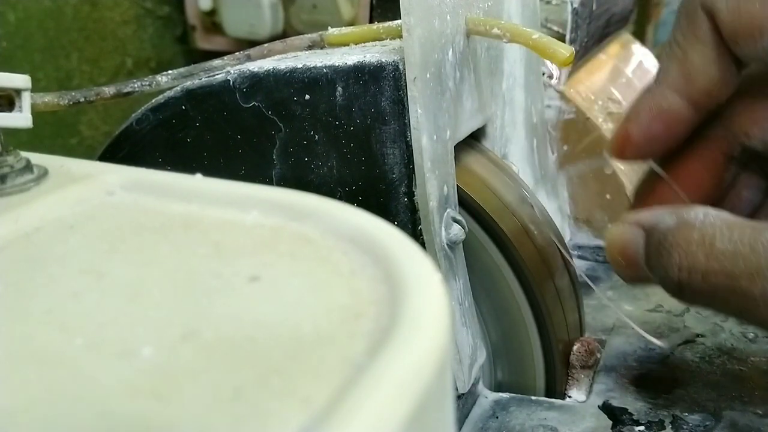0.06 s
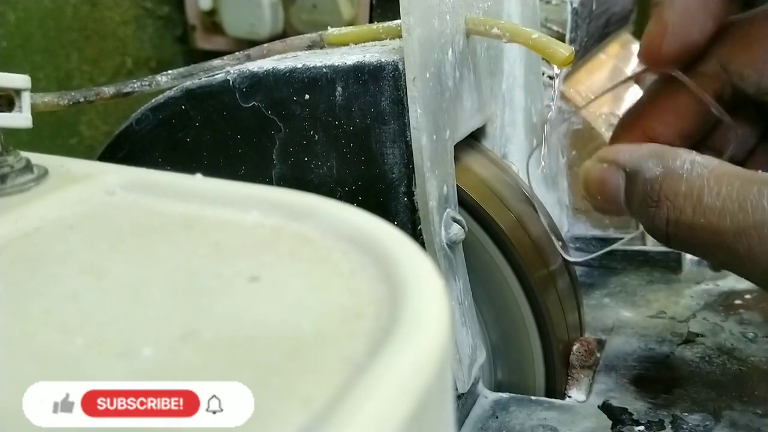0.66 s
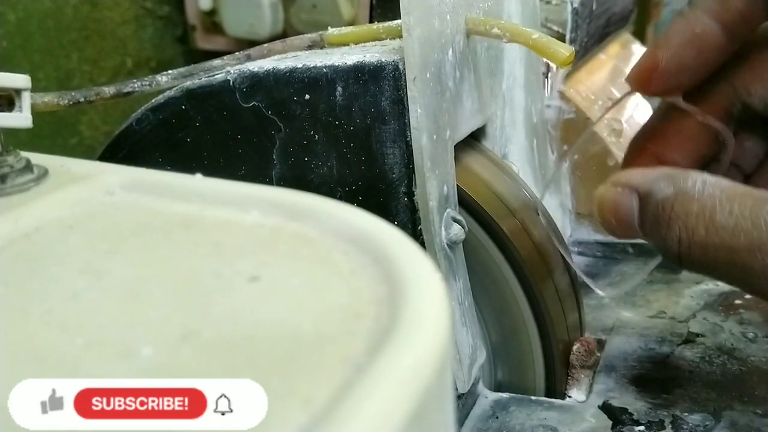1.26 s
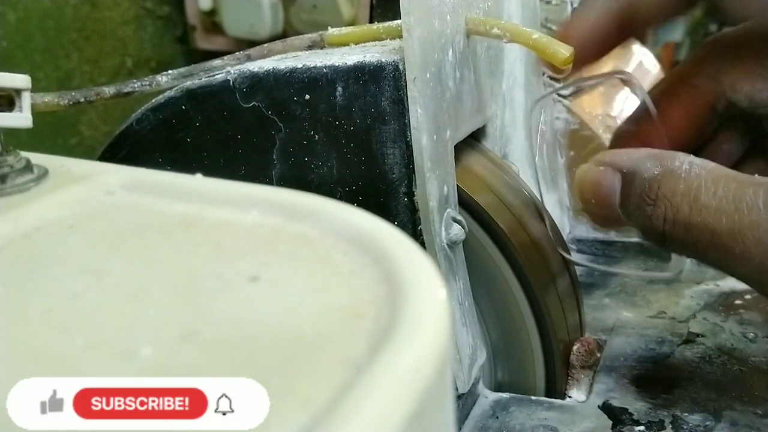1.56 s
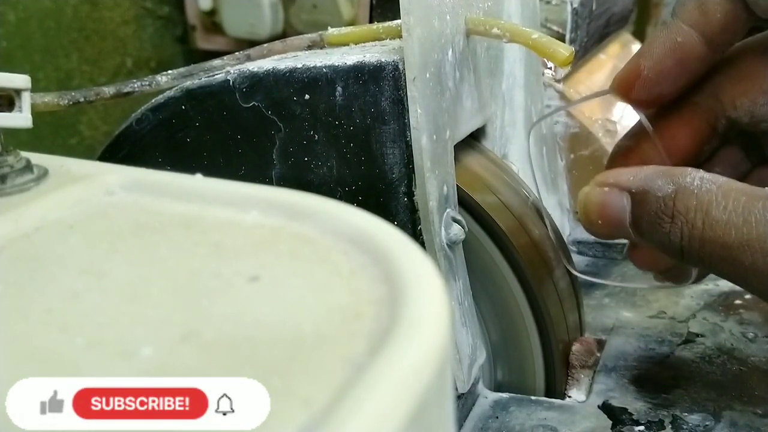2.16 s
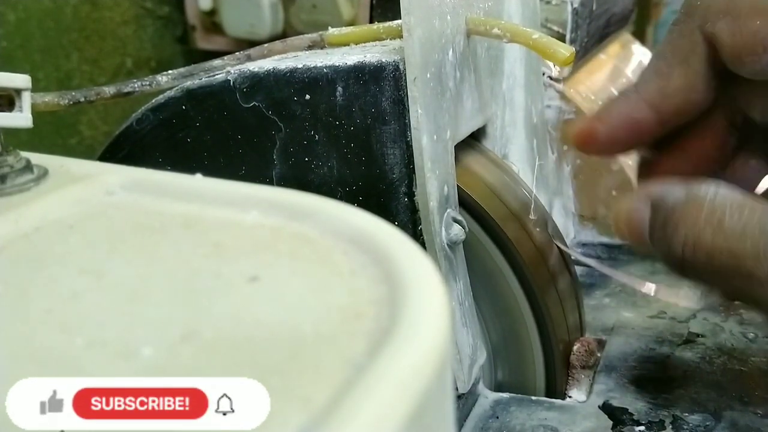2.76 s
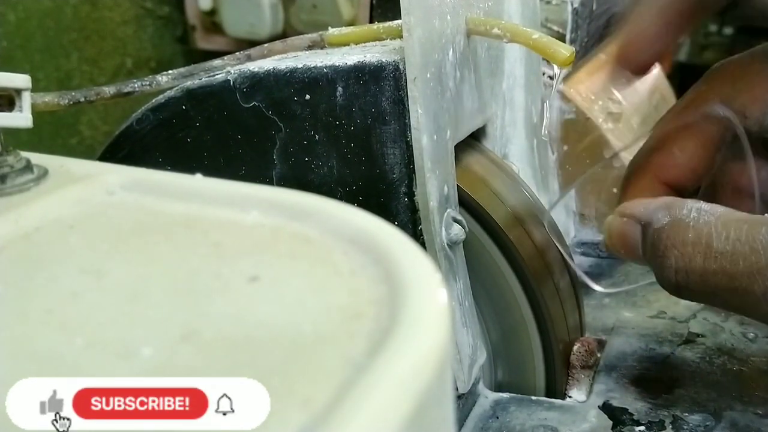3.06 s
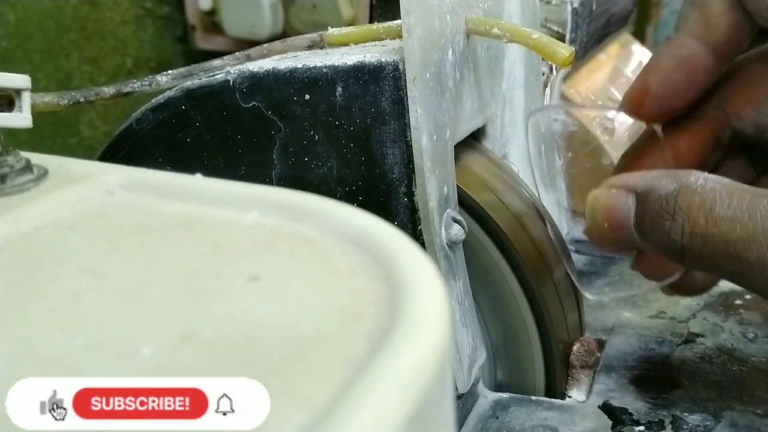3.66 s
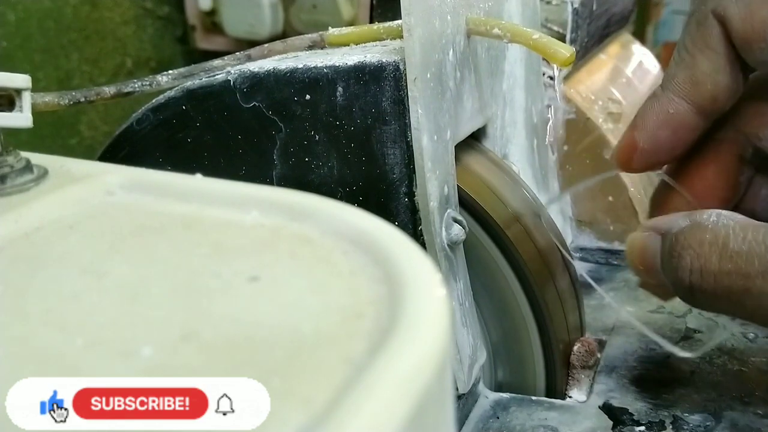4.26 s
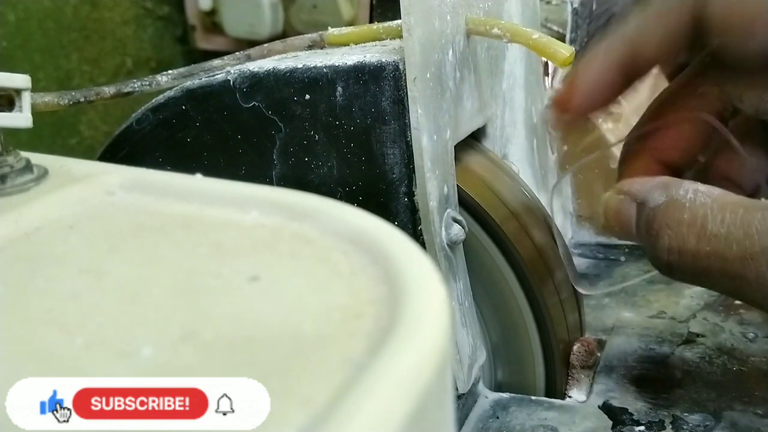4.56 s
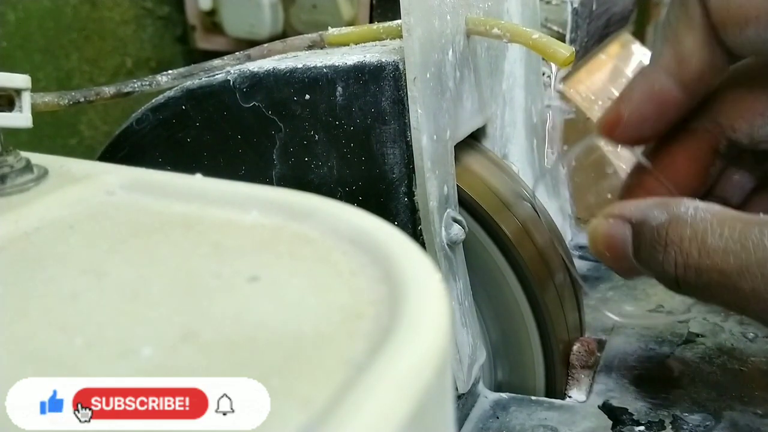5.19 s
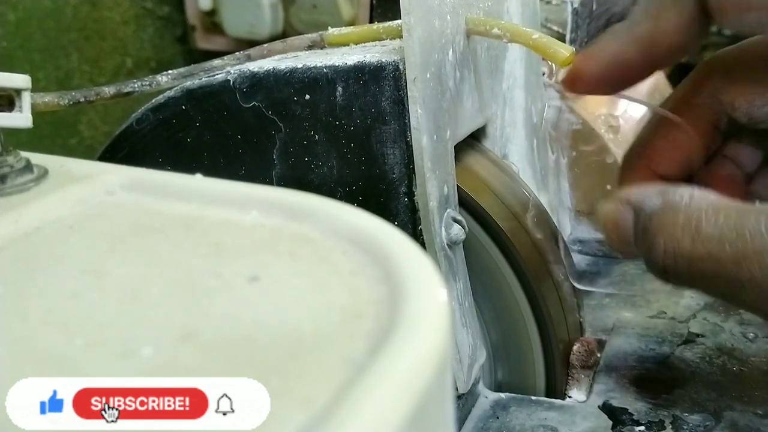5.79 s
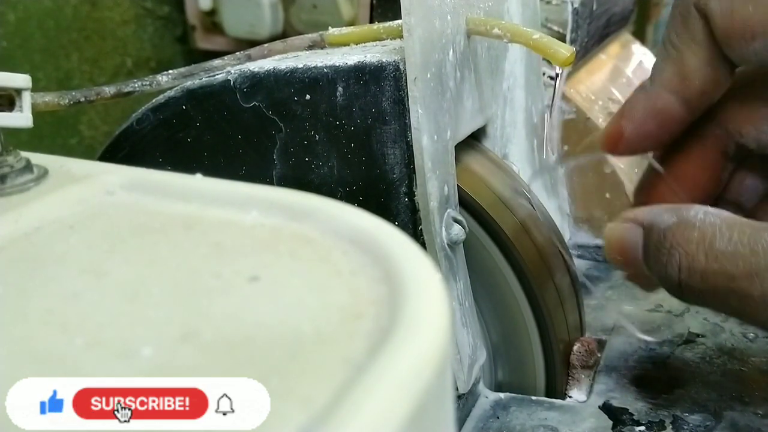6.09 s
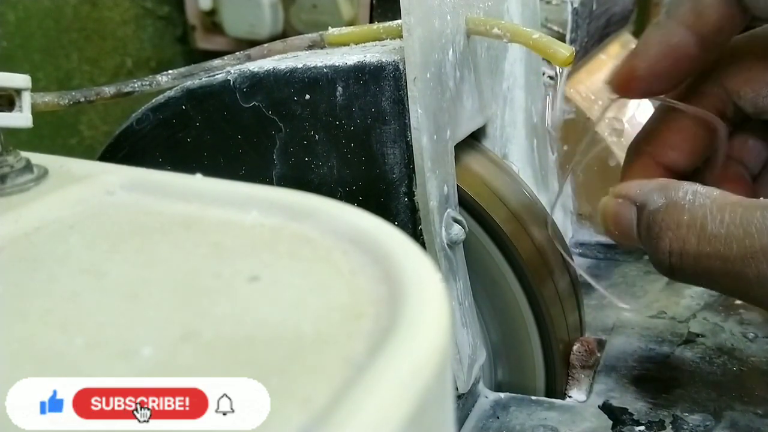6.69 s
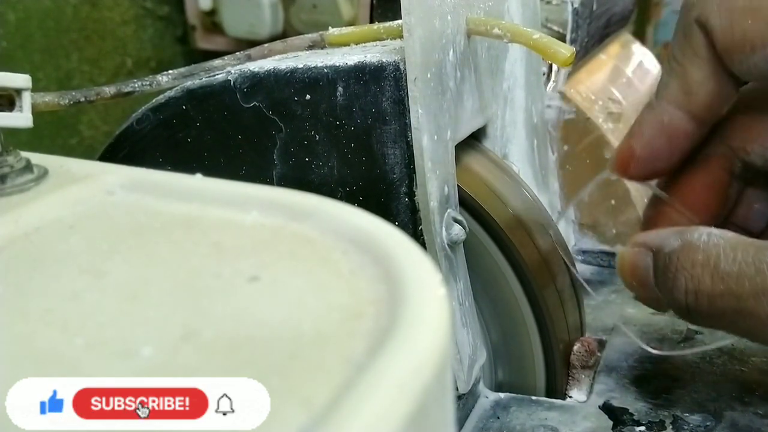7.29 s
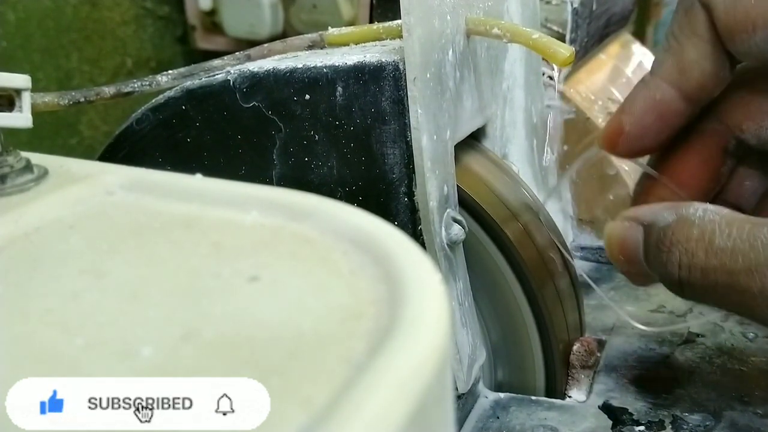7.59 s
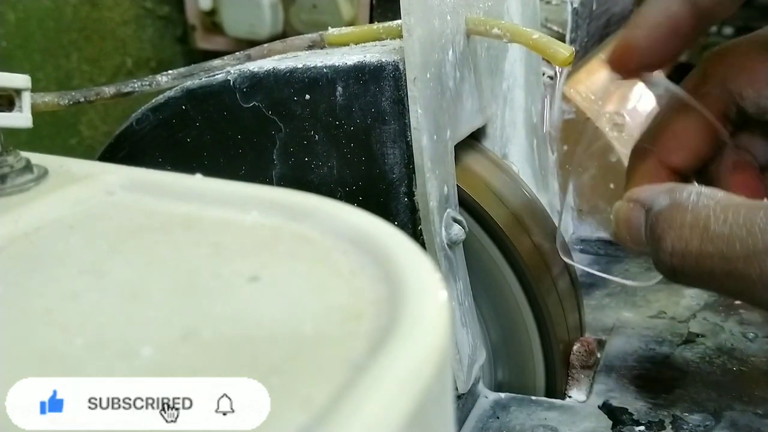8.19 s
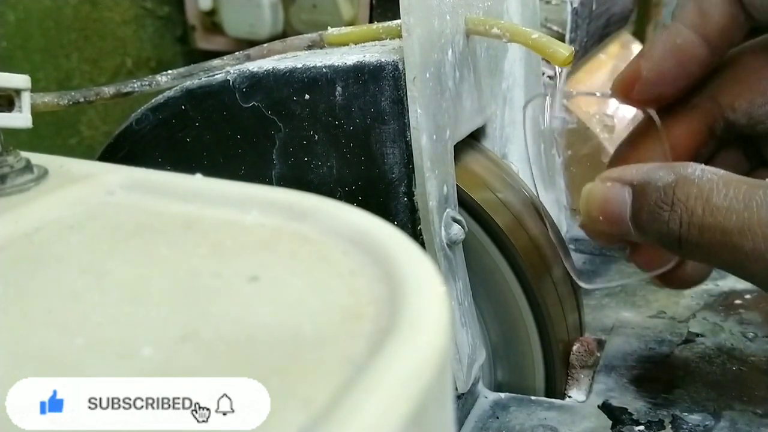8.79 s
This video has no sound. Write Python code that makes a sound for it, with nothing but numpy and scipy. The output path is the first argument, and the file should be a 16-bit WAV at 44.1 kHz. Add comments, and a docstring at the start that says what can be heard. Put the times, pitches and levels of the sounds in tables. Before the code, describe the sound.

A spectacle lens grinds on a wet spinning wheel with a high, buzzing hiss, ringing scrapes and brief squeals over low machine rumble.

```python
"""From the start, a spectacle lens is turned by hand against a wet grinding wheel, over a machine's hum.
The same grit passes about 49 times a second, so the hiss buzzes, and the lens rings in gliding scrapes.
Near 0.5 s the lens sticks and slips with a squeal. Around 1.5 s a low rumble swells and the first drop
of cooling water falls. The rumble sinks at 2.5 s, more drops follow, and the lens squeals near 4.5 s.
The rumble returns after 5 s, a last squeal comes near 6.4 s, and the grinding carries on to 9 s."""
import sys
import numpy as np
from scipy import signal
from scipy.fft import rfft, irfft, next_fast_len
from scipy.io import wavfile
from scipy.ndimage import uniform_filter1d, map_coordinates

SR = 44100
rng = np.random.default_rng(int(sys.argv[2]) if len(sys.argv) > 2 else 0)


def bounce(signal):
    """Save signal as a 16-bit WAV file at the path given by the first command-line argument."""
    frames = np.transpose(np.atleast_2d(signal))
    limited = np.clip(frames, -1, 1)
    pcm = np.round(limited * 32767).astype(np.int16)
    wavfile.write(sys.argv[1], SR, pcm)


N = 398663
TIME = np.arange(N) / SR


# The tone of the grinding on the left and on the right. Columns: pitch_hz, relative_db
LEFT_TONE = [(500, -36), (1100, -30), (1350, -28.5), (1550, -12), (1750, -7), (2100, 0.5), (2900, 2.5),
             (3500, -3.5), (5000, -2), (6000, -7), (7200, 2), (8000, -7.5), (10500, -0.5), (13300, 3),
             (15700, -9)]
RIGHT_TONE = [(500, -31.5), (1100, -32), (1400, -29), (1750, -6), (2100, -2), (2900, -2.5), (3500, -3.5),
              (5000, -8.5), (6000, -5.5), (7200, -2), (8000, -10), (10500, -10.5), (13300, -15),
              (15700, -13)]
# Peaks and dips added by the wheel guard and tray. Columns: pitch_hz, width_hz, left_db, right_db
GUARD_PEAKS = [(1720, 110, -6, -6), (2130, 50, 3, 4), (2400, 80, 2, 4), (2580, 50, 1, 4), (3010, 70, 2, -1),
               (3150, 80, 1, -12), (3260, 50, 4, -3), (3350, 80, 1, -8), (3695, 50, -11, -8),
               (3830, 110, 1, 4), (3990, 50, 3, 5), (4100, 60, -4, -1), (4270, 50, 2, 3), (4530, 80, 5, 0),
               (4730, 50, 4, 3), (4920, 50, 3, 2), (5110, 80, 1, 2), (6330, 130, -2, -5),
               (6590, 220, 3, -6), (6760, 80, -2, -6), (7220, 80, -5, -6), (7850, 300, -3, -3),
               (8370, 220, 2, -2), (8630, 220, 3, -9), (9320, 220, 3, 3), (9950, 220, -1, 2),
               (10460, 220, 2, 4), (11920, 220, -2, -2), (12400, 220, 2, 2), (13480, 80, 6, 3),
               (14500, 220, 4, 4)]
# Paths round the guard shift the left wave ahead of the right. Columns: pitch_hz, extra_lead_radians
GUARD_LEAD = [(1200, -1.8), (1550, -.1), (2700, .8), (3100, .5), (3400, -.5), (3750, -.6), (4300, 1.8),
              (4750, .3), (5100, -1.5), (5700, -1.7), (6000, .9), (6600, 2), (6950, -.6)]

def grinding(turns, left_db=-22.5, right_db=-28.0, lead_s=0.0002864):
    """Grit scrapes the lens; the guard colours the sound, which reaches the left side first."""
    def left(hz):
        return read(LEFT_TONE, hz) + sum(db * bell(2 * (hz - f) / w) for f, w, db, _ in GUARD_PEAKS)

    def right(hz):
        return read(RIGHT_TONE, hz) + sum(db * bell(2 * (hz - f) / w) for f, w, _, db in GUARD_PEAKS)

    def lead(hz):
        return 2 * np.pi * hz * lead_s + read(GUARD_LEAD, hz)

    hiss = np.array([grit(turns), grit(turns)]) * gain_of(high_spots(turns))
    ringing = shifting_grip(lens(hiss, turns))
    return gain_of([[left_db], [right_db]]) * reflections(stereo(ringing, left, right, lead))


# How much of the grit pattern comes back a turn later. Columns: pitch_hz, share (0 to 1)
GRIT_KEPT = [(1500, .95), (2400, .94), (4000, .92), (7000, .87), (10000, .74), (15000, .8)]
# Hiss of gritty water, new on every turn, next to the lasting grit. Columns: pitch_hz, relative_db
WATER_HISS = [(1500, -3), (2400, -5), (4000, -5), (7000, -1), (10000, 0), (15000, 0)]

def grit(turns, size=894):
    """The wheel's rough track passes once a turn, slowly wearing down under ever new gritty water."""
    hz = np.fft.rfftfreq(size, 1 / SR)
    kept = np.clip(read(GRIT_KEPT, hz), 0, .98)
    wet = gain_of(read(WATER_HISS, hz))
    wear, water_real, water_imag = rng.standard_normal((3, int(turns[-1]) + 2, len(hz)))  # a row a turn
    worn_phase = np.cumsum(np.sqrt(-2 * np.log(kept + 1e-9)) * wear, 0)
    lasting = np.exp(1j * (2 * np.pi * rng.random(len(hz)) + worn_phase))
    water = wet * (water_real + 1j * water_imag) / np.sqrt(2)
    track = irfft((lasting + water) / np.sqrt(1 + wet ** 2), 2 * size).ravel()
    return evened(map_coordinates(track, [turns * 2 * size], order=3))


def high_spots(turns, off_centre_db=0.97, bulges_db=0.08, bumps_db=-0.56):
    """Contact force in dB: the wheel runs off centre, has three bulges and many smaller bumps."""
    angle = 2 * np.pi * turns
    wander = drift(size=9000)  # the bumps under the lens change as it slides across the wheel
    bumps = sum(np.cos(k * angle + rng.normal() * 2 * wander + 2 * np.pi * rng.random()) / np.sqrt(k)
                for k in range(2, 20))
    return off_centre_db * np.cos(angle) + bulges_db * np.cos(3 * angle) + bumps_db * evened(bumps)


# How hard the hand presses the lens on the wheel. Columns: time_s, pressure (0 is normal)
HAND_PRESSURE = [(0.0, -1), (0.12, -1.5), (0.23, 1.5), (0.63, 0), (0.86, 2), (1.16, -2), (1.23, 1.5),
                 (1.42, -3), (1.6, 3), (2.07, 0.4), (2.32, 2.5), (2.46, -0.1), (3.07, -0.5), (3.23, -2.5),
                 (3.32, -0.5), (3.39, 4.5), (3.46, 3.5), (3.6, -0.3), (3.74, 3), (3.88, -0.5), (3.99, 2.5),
                 (4.06, -1.5), (4.13, 0.7), (4.23, -2.5), (4.34, 1.5), (4.57, 1), (4.81, 1.5), (4.88, -0.5),
                 (4.99, -0.5), (5.04, 3), (5.55, -2), (5.62, 4), (5.69, -5), (5.8, -2.5), (6.06, 3.5),
                 (6.13, 1.3), (6.57, -0.5), (6.83, -1.5), (7.06, 4), (7.22, -2), (7.36, 1.2), (7.66, 1.5),
                 (7.96, -0.3), (8.06, -1), (8.24, -3), (8.45, -1.5), (8.52, 4), (8.61, 1.8), (8.89, 4),
                 (9.03, 1)]
# Pressing harder lifts the low end of the hiss. Columns: pitch_hz, boost_db_per_unit_of_pressure
PRESSURE_BOOST = [(1000, 0), (1600, 0.48), (1900, 3.36), (2150, 1.77), (2450, 0.58), (3500, 0.8), (5500, 0)]
# The treble rises and falls. Columns: time_s, change_db
TREBLE_CHANGE = [(0.0, -2.5), (0.09, 4.5), (0.21, -3.5), (0.37, -1.2), (0.56, -3), (0.79, 2.5), (0.93, 0.3),
                 (1.0, 3), (1.21, -0.5), (1.32, 1.5), (1.56, 3), (1.76, -1.3), (2.11, -0.9), (2.21, -4),
                 (2.46, -0.2), (2.58, -1.3), (2.83, 0), (2.97, 1.7), (3.04, -1.2), (3.18, 1.5), (3.44, -2),
                 (3.51, -1.5), (3.62, -2.2), (3.69, 0.7), (3.99, -1), (4.06, 1.5), (4.13, -2), (4.2, 2.2),
                 (4.37, -2), (4.41, -5), (4.55, -2.5), (4.92, 2), (5.09, -1), (5.29, 2.7), (5.53, 3),
                 (5.6, -2), (5.64, -1.5), (5.9, -1.7), (6.01, 1.3), (6.13, -1.3), (6.34, -2.5), (6.59, 1),
                 (6.73, 3), (6.92, 0.5), (7.2, -0.8), (7.52, -1.2), (7.64, 0), (7.8, -2), (7.87, 1),
                 (8.03, -1.5), (8.24, 1), (8.41, -2), (8.5, -1.9), (8.8, -0.4), (8.96, -5.5), (9.03, -3.5)]
# How strongly each pitch follows that change. Columns: pitch_hz, multiplier
TREBLE_WEIGHT = [(2000, 0), (3000, 0.43), (6000, 0.69), (10000, 1.02), (14000, 1.03)]
# Low rasps as the rim of the lens catches. Columns: middle_s, length_s, pitch_hz, boost_db
RIM_RASPS = [(0.42, 0.086, 1120, 20), (2.463, 0.087, 1290, 27), (3.773, 0.11, 1470, 23),
             (3.955, 0.22, 1310, 23), (4.14, 0.26, 1460, 8), (4.294, 0.116, 1370, 19),
             (5.214, 0.045, 1530, 22), (5.615, 0.042, 1330, 27), (6.134, 0.25, 1380, 10),
             (7.163, 0.1, 1290, 19), (7.674, 0.063, 1140, 25), (8.12, 0.21, 1160, 15)]
# How far the wet contact flickers by chance. Columns: pitch_hz, typical_swing_db
WET_FLICKER = [(1500, 4), (2100, 1.1), (4000, 1.5), (7000, 2.6), (13000, 2.4)]

def lens(hiss, turns, rasp_width_hz=110, sputter_db=1.33):
    """Hand pressure darkens the hiss; scrapes, squeals and rasps of the lens boost parts of it."""
    hz, t, spectrum = to_spectrum(hiss, size=384)
    octaves = np.log2(np.maximum(hz, 1))[:, None]
    water_film = np.interp(t, TIME, drift(size=2400))  # comes and goes
    treble_db = follow(TREBLE_CHANGE, t) + sputter_db * water_film
    boost_db = np.outer(read(PRESSURE_BOOST, hz), follow(HAND_PRESSURE, t))
    boost_db += np.outer(read(TREBLE_WEIGHT, hz), treble_db)
    wheel_angle = 2 * np.pi * np.interp(t, TIME, turns)
    boost_db += scrapes(octaves, t) + squeals(octaves, t, wheel_angle)
    for middle, length, rasp_hz, db in RIM_RASPS:
        swell = bell(np.e * (t - middle) / length)
        boost_db += db * np.outer(bell((hz - rasp_hz) / rasp_width_hz), swell)
    boost_db += read(WET_FLICKER, hz)[:, None] * patches(boost_db.shape, bands=5, frames=45)
    return to_sound(spectrum * gain_of(boost_db), size=384)


# The lens rings as a stretch of its rim slides over the grit. Columns: start_s, length_s,
# middle_pitch_hz, boost_db, glide_octaves_per_s, width_octaves, overtones_db
RIM_SCRAPES = [(0.189, 0.211, 14080, 10.7, 0.4, 0.1, 0), (0.193, 0.362, 8630, 9.6, 0.6, 0.1, 0),
               (0.696, 0.766, 2850, 3.4, 0.1, 0.09, 4), (0.7, 0.62, 7330, 5, 0, 0.03, 0),
               (0.7, 1.6, 3010, 4.5, 0, 0.02, 0), (0.72, 0.6, 5120, 3.5, 0, 0.04, 0),
               (1.032, 0.136, 7940, 7.1, 1.5, 0.08, 0), (1.342, 0.21, 8400, 11.8, -0.1, 0.07, 0),
               (1.457, 0.929, 3210, 3.0, 0.0, 0.15, 4), (1.574, 0.105, 10950, 7.4, -0.4, 0.04, 0),
               (1.717, 0.624, 12300, 4.2, 0.0, 0.17, 0), (2.348, 0.151, 3980, 13.3, -1.4, 0.13, 1),
               (2.507, 0.335, 2740, 4.1, -0.5, 0.42, 5), (2.814, 0.211, 9550, 7.6, -0.2, 0.08, 0),
               (2.997, 0.158, 6590, 7.4, 1.1, 0.1, 0), (2.998, 0.14, 4360, 11.8, 1.8, 0.14, 0),
               (3.074, 0.184, 12940, 4.7, 3.4, 0.11, 0), (3.444, 0.368, 12320, 5.4, -0.1, 0.04, 0),
               (3.814, 0.08, 3790, 14.5, -1.9, 0.17, 2), (4.056, 0.082, 4000, 15.6, 1.3, 0.13, 1),
               (4.148, 0.099, 3820, 13.1, -1.1, 0.19, 1), (4.373, 0.183, 8590, 9.2, 0.7, 0.19, 0),
               (4.594, 0.092, 4460, 10.6, 0.2, 0.13, 0), (4.781, 0.169, 7920, 8.3, 1.2, 0.09, 0),
               (4.905, 0.272, 3360, 5.6, 0.2, 0.15, 2), (4.92, 0.09, 13550, 10.6, -0.1, 0.05, 0),
               (5.013, 0.262, 10830, 10.3, -0.6, 0.09, 0), (5.187, 0.082, 3970, 12.7, -1.9, 0.13, 4),
               (5.275, 0.271, 2530, 1.6, -1.1, 0.31, 6), (5.539, 0.12, 3630, 3.2, 0.2, 0.17, 4),
               (5.562, 0.133, 4450, 9.1, 3.0, 0.17, 0), (5.652, 0.175, 15350, 8.5, 2.8, 0.22, 0),
               (6.088, 0.082, 3850, 14.2, -2.6, 0.17, 2), (6.245, 0.216, 8680, 10.1, 0.5, 0.11, 0),
               (6.512, 0.091, 4440, 10.2, 0.1, 0.13, 0), (6.666, 0.144, 7920, 7.7, 1.7, 0.07, 0),
               (6.772, 0.205, 3470, 5.6, 0.3, 0.1, 1), (6.886, 0.274, 10750, 8.9, -0.5, 0.08, 0),
               (6.887, 0.215, 5490, 7.8, 0.3, 0.09, 0), (7.1, 0.15, 3890, 12.1, -2.4, 0.16, 2),
               (7.261, 0.13, 2730, 3.6, -1.0, 0.42, 8), (7.264, 0.457, 8580, 5.2, -0.1, 0.05, 0),
               (7.3, 0.38, 4720, 3, 0, 0.06, 0), (7.3, 1.1, 2420, 4.5, 0, 0.025, 0),
               (7.337, 0.314, 12160, 4.3, -0.5, 0.04, 0), (7.388, 0.26, 2740, 0.6, 0.5, 0.42, 6),
               (7.411, 0.305, 2640, 4.9, 1.7, 0.09, 1), (7.641, 0.323, 2480, 1.0, -0.6, 0.09, 5),
               (7.667, 0.182, 14060, 11.0, -0.5, 0.08, 0), (7.736, 0.247, 9430, 7.1, -0.2, 0.07, 0),
               (7.977, 0.172, 4650, 12.2, 1.8, 0.13, 0), (8.013, 0.132, 6520, 10.4, 1.5, 0.09, 0),
               (8.084, 0.13, 12270, 8.5, 3.4, 0.14, 0), (8.319, 0.173, 2140, 8.3, 0.9, 0.14, 0),
               (8.45, 0.5, 10600, 4, 0, 0.04, 0), (8.494, 0.339, 12370, 4.3, 0.0, 0.04, 0),
               (8.84, 0.137, 6050, 8.8, -0.6, 0.09, 0), (8.929, 0.151, 15090, 7.9, 2.0, 0.17, 0),
               (8.968, 0.12, 3010, 8.8, 1.0, 0.1, 2), (8.994, 0.084, 4110, 16.3, -1.2, 0.09, 4)]
# An overtone and two dips that glide with each scrape.
# Columns: pitch_ratio, width_octaves, multiplier (of overtones_db; below 0 makes a dip)
SCRAPE_OVERTONES = [(.6, 0.37, -0.46), (1.8, 0.14, 0.85), (2.4, 0.12, -1.3)]

def scrapes(octaves, t, fade_s=.04, roundness=1.68, steepness=0.66):
    """Boost in dB by pitch and time: the lens's ringing tones glide together as the contact moves."""
    boost_db = np.zeros((len(octaves), len(t)))
    for start, length, hz, db, glide, width, overtones_db in RIM_SCRAPES:
        strength = held(t, start, length, fade_s, fade_s)
        on = strength > 0
        away = octaves - np.log2(hz) - glide * (t[on] - start - length / 2)
        peak = np.exp(-steepness * abs(away / width) ** roundness)
        overtones = sum(share * bell((away - np.log2(ratio)) / spread)
                        for ratio, spread, share in SCRAPE_OVERTONES)
        boost_db[:, on] += strength[on] * (db * peak + overtones_db * overtones)
    return boost_db


# Squeals, each with a whistle about an octave higher.
# Columns: start_s, length_s, pitch_hz, boost_db, whistle_hz, whistle_boost_db
LENS_SQUEALS = [(.41, .22, 6820, 16.5, 13450, 13), (4.43, .18, 6860, 15.5, 13490, 15),
                (6.335, .18, 6500, 11, 13480, 11)]

def squeals(octaves, t, angle, width_octaves=0.089, whistle_width_octaves=0.076, chatter=0.099):
    """Boost in dB as the lens sticks and slips: the squeal flares once a turn, its whistle three times."""
    once_a_turn = 1 + chatter * (np.cos(angle) + .5 * np.cos(2 * angle))
    at_each_bulge = 1 + chatter * np.cos(3 * angle)
    boost_db = 0
    for start, length, hz, db, whistle_hz, whistle_db in LENS_SQUEALS:
        strength = held(t, start, length, rise_s=0.13, fall_s=0.099)
        squeal = db * bell((octaves - np.log2(hz)) / width_octaves)
        whistle = whistle_db * bell((octaves - np.log2(whistle_hz)) / whistle_width_octaves)
        boost_db += strength * (squeal * once_a_turn + whistle * at_each_bulge)
    return boost_db


# How far the ringing of the lens changes with the grip. Columns: pitch_hz, typical_swing_db
GRIP_SWING = [(1700, 3.5), (2200, 1.7), (3000, 1.9), (4000, 3), (8000, 2.8), (11000, 1.3)]

def shifting_grip(sound):
    """Narrow ringing tones of the lens come and go as the fingers shift their grip."""
    hz, _, spectrum = to_spectrum(sound, size=1024)
    boost_db = read(GRIP_SWING, hz)[:, None] * patches(spectrum.shape[1:], bands=4, frames=48)
    return to_sound(spectrum * gain_of(boost_db), size=1024)


def reflections(sound, echo_db=-4.0, latest_s=.012, from_hz=5500, count=14):
    """Treble bounces off hard surfaces close by, which lifts some pitches and weakens others."""
    echoes = np.zeros((2, SR // 20))
    delays = (rng.uniform(0.0022, latest_s, (2, count)) * SR).astype(int)
    np.put_along_axis(echoes, delays, rng.choice([-1, 1], delays.shape) / np.sqrt(count), 1)
    treble = signal.sosfilt(signal.butter(2, from_hz, "high", fs=SR, output="sos"), sound)
    return evened(sound + gain_of(echo_db) * signal.oaconvolve(treble, echoes, axes=1)[:, :N])


# Short, soft chirps of the lens. Columns: middle_s, length_s, cycles_per_turn, peak_db
LENS_CHIRPS = [(1.31, 0.11, 20, -58), (1.498, 0.028, 20, -53), (2.79, 0.11, 20, -58),
               (3.12, 0.047, 20, -59)]

def chirps(turns):
    """The lens briefly sings at a multiple of the wheel's speed."""
    return sum(gain_of(db) * bell(np.e * (TIME - middle) / length) * np.sin(2 * np.pi * cycles * turns)
               for middle, length, cycles, db in LENS_CHIRPS)


# Tones of the spinning shaft and wheel. Columns: cycles_per_turn, base_level_db
SHAFT_TONES = [(2, -90), (3.08, -71), (4, -82), (6.12, -80.5), (9, -79.5), (10, -83.5), (18, -85),
               (20, -82.5), (23, -90), (26, -80.5), (29, -102), (32, -69), (43, -64), (49, -53.5),
               (52, -54.5), (61, -54.5)]
# The low hum comes from the right. Columns: pitch_hz, shift_db (added right, taken from the left)
HUM_BALANCE = [(150, 2.5), (400, -0.5)]

def shaft_hum(turns, waver_db=7.0, wobble_radians=1.0, pressure_share=0.77):
    """The shaft hums in rough, wavering tones; the high ones swell as the lens presses on the wheel."""
    out = np.zeros((2, N))
    pressure = pressure_share * follow(HAND_PRESSURE, TIME)
    for cycles, db in SHAFT_TONES:
        hz = cycles * WHEEL_SPEED[0][1]
        level_db = db + read(PRESSURE_BOOST, hz) * pressure + waver_db * drift(size=2500)
        sides = gain_of(read(HUM_BALANCE, hz) * np.array([[-1], [1]]))
        tone = np.sin(2 * np.pi * cycles * turns + wobble_radians * drift(size=1500))
        out += sides * gain_of(level_db) * tone
    return np.sqrt(2) * out


# How the machine's rumble rises and falls. Columns: time_s, base_level_db
RUMBLE_SWELLS = [(0, -74), (.55, -68), (.7, -63.5), (1.4, -56), (1.8, -60), (2.3, -55), (2.5, -69.5),
                 (4.85, -71), (5.3, -55), (5.55, -62.5), (5.85, -56), (6.2, -61.5), (6.45, -57),
                 (7.4, -53.5), (7.8, -52), (8.3, -58), (9.04, -49.5)]
# The tone of the rumble. Columns: pitch_hz, relative_db
RUMBLE_TONE = [(20, -3), (40, -16), (60, 5.5), (80, 5), (120, 2), (165, -11), (220, -25), (400, -28)]
# Dull, swelling notes in the machine body. Columns: middle_s, length_s, pitch_hz, base_peak_db
BODY_THRUMS = [(1.55, 0.75, 153.6, -61), (7.02, 0.087, 78, -44), (7.75, 0.5, 153.6, -59.5),
               (8.84, 0.034, 72.5, -45), (8.99, 0.17, 153, -42)]

def rumble(left_db=-1.0, right_db=6.0):
    """The machine body rumbles and now and then thrums, more to the right."""
    thrums = 0
    for middle, length, hz, db in BODY_THRUMS:
        t = TIME - middle
        thrums += gain_of(db) * bell(4 * t / length) * np.sin(2 * np.pi * hz * t)
    low_noise = gain_of(follow(RUMBLE_SWELLS, TIME)) * noise(RUMBLE_TONE)
    return gain_of([[left_db], [right_db]]) * (low_noise + thrums)


# Drops of cooling water. Columns: start_s, level_db, pitch_hz, ring_s (time to fade by 60 dB)
WATER_DROPS = [(1.463, -58, 313, 0.16), (2.75, -56, 247, 0.15), (3.08, -51, 740, 0.057),
               (3.322, -48, 296, 0.085), (4.616, -50, 315, 0.065), (4.773, -48, 724, 0.091),
               (8.171, -52, 740, 0.11), (8.746, -45, 292, 0.048), (8.873, -44.5, 730, 0.12)]

def drops(rise_s=0.00061):
    """Each drop falls into the tray with a soft, short ring."""
    out = np.zeros(N)
    t = np.arange(SR // 4) / SR
    for start, db, hz, ring_s in WATER_DROPS:
        envelope = np.exp(-np.log(1000) * t / ring_s) * (1 - np.exp(-t / rise_s))
        ring = gain_of(db) * envelope * np.sin(2 * np.pi * hz * t)
        part = out[round(start * SR):][:len(t)]
        part += ring[:len(part)]
    return out


# The tone of the workshop's air. Columns: pitch_hz, relative_db
AIR_TONE = [(20, -17), (70, -11), (150, 10.5), (230, 4), (600, 3), (1100, -3), (2000, 3), (8000, -32)]

def workshop_air(level_db=-63):
    """The air of the room is a faint, steady noise."""
    return gain_of(level_db) * noise(AIR_TONE)


def noise(tone):
    """Stereo noise shaped by a tone table."""
    shape_db = lambda hz: read(tone, hz)
    return stereo(rng.standard_normal((2, N)), shape_db, shape_db)


# How alike the left and right sides sound. Columns: pitch_hz, likeness (0 to 1)
SIDE_LIKENESS = [(60, 1), (250, 0.46), (500, 0), (1300, 0.47), (1750, 0.99), (2300, 0.19), (3000, 0.6),
                 (3350, 0), (3700, 0.54), (4200, 0.61), (4500, 0.2), (6200, 0.7), (8000, 0.13),
                 (14000, 0.67)]

def stereo(pair, left_db, right_db, lead=None):
    """Blends two unrelated signals into partly alike sides and gives each its own tone."""
    size = next_fast_len(N)
    hz = np.fft.rfftfreq(size, 1 / SR)
    left, other = rfft(pair, size)
    same = np.clip(read(SIDE_LIKENESS, hz), 0, 1)
    right = same * left + np.sqrt(1 - same ** 2) * other
    if lead:
        right *= np.exp(-1j * lead(hz))
    return evened(irfft([left * gain_of(left_db(hz)), right * gain_of(right_db(hz))], size)[:, :N])


def gain_of(db):
    """Turns decibels into a multiplier."""
    return 10 ** (np.asarray(db) / 20)


def evened(x):
    """Scales each row to an average strength (rms) of 1."""
    return x / np.sqrt(np.mean(x ** 2, -1, keepdims=True) + 1e-20)


def read(table, hz):
    """Looks up a table by pitch, with octaves evenly spaced."""
    pitches, values = np.transpose(table)
    return np.interp(np.log(hz + 1), np.log(pitches + 1), values)


def follow(table, t):
    """Looks up a table by time."""
    return np.interp(t, *np.transpose(table))


def bell(distance):
    """A smooth peak of height 1."""
    return np.exp(-.5 * distance ** 2)


def held(t, start, length, rise_s, fall_s):
    """Fades in, holds at up to 1 and fades out."""
    return np.clip(np.minimum((t - start) / rise_s, (start + length - t) / fall_s) + .5, 0, 1)


def drift(size):
    """A slow random wander, smoothed over size samples."""
    return evened(uniform_filter1d(uniform_filter1d(rng.standard_normal(N), size), size))


def patches(shape, bands, frames):
    """Random highs and lows, smoothed across pitch bands and time frames."""
    across_pitch = uniform_filter1d(rng.standard_normal(shape), bands, axis=0)
    return evened(uniform_filter1d(across_pitch, frames, axis=1))


def to_spectrum(sound, size):
    """Splits sound into pitch bands and overlapping frames of size samples."""
    return signal.stft(sound, SR, nperseg=size, noverlap=size - size // 4)


def to_sound(spectrum, size):
    """Joins the bands and frames back into sound."""
    return signal.istft(spectrum, SR, nperseg=size, noverlap=size - size // 4)[1][:, :N]


# The wheel's speed, which wanders slightly. Columns: time_s, turns_per_s
WHEEL_SPEED = [(0.0, 49.27), (0.55, 49.39), (1.1, 49.22), (1.84, 49.37), (2.5, 49.2), (3.0, 49.28),
               (3.32, 49.47), (4.0, 49.22), (4.5, 49.38), (5.4, 49.25), (5.74, 49.48), (6.05, 49.24),
               (6.33, 49.42), (7.0, 49.38), (7.23, 49.25), (7.8, 49.35), (8.35, 49.42), (9.04, 49.08)]

def scene():
    """One spinning wheel drives the grinding, chirps and hum, over rumble, drops and air."""
    turns = np.cumsum(follow(WHEEL_SPEED, TIME)) / SR
    return grinding(turns) + chirps(turns) + shaft_hum(turns) + rumble() + drops() + workshop_air()


def record(dry):
    """Cuts away the very highest treble."""
    cutoff_hz = 15800
    low_pass = signal.firwin(601, cutoff_hz, window=("kaiser", 9), fs=SR)
    return signal.oaconvolve(dry, low_pass[None], "same")


dry = scene()
out = record(dry)
bounce(out)
```